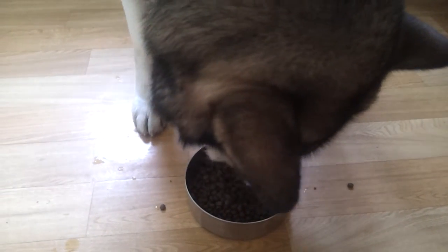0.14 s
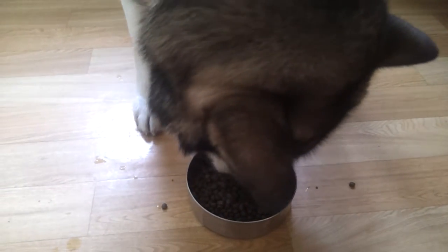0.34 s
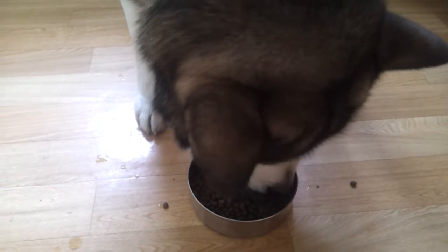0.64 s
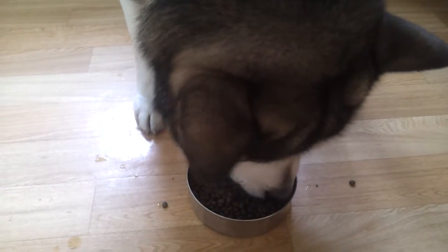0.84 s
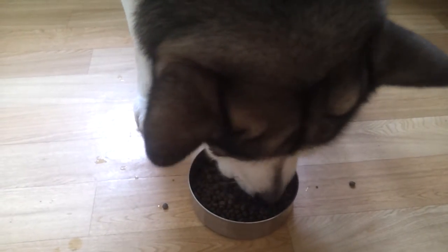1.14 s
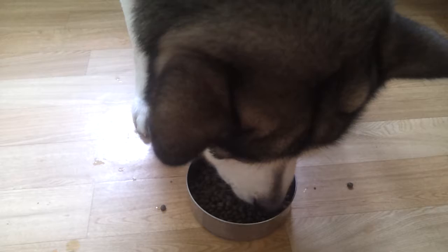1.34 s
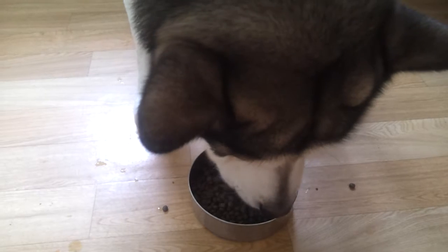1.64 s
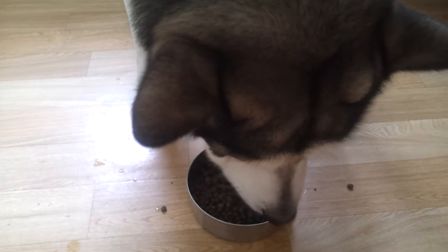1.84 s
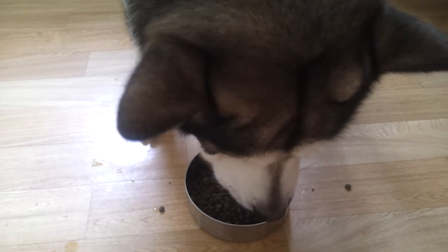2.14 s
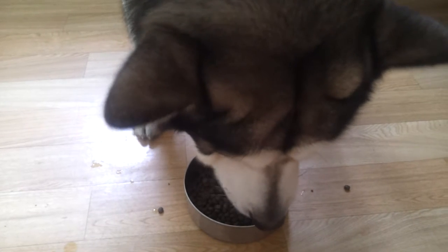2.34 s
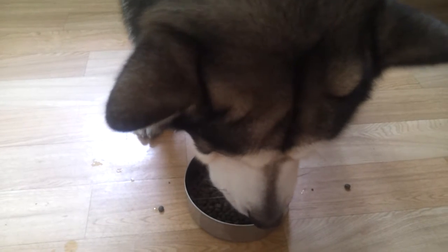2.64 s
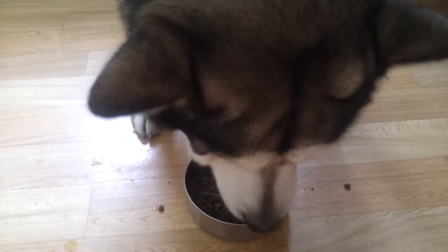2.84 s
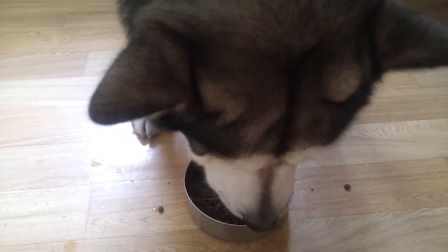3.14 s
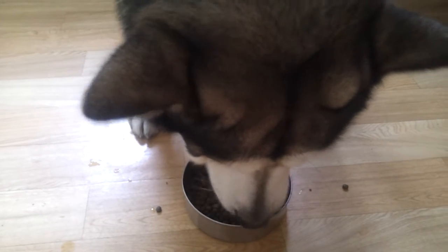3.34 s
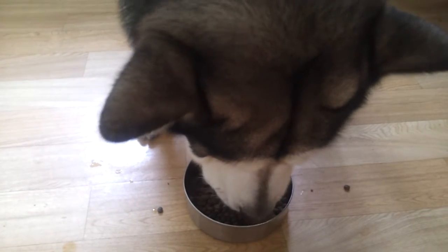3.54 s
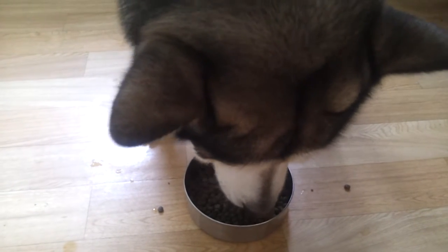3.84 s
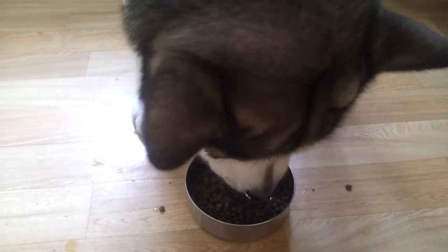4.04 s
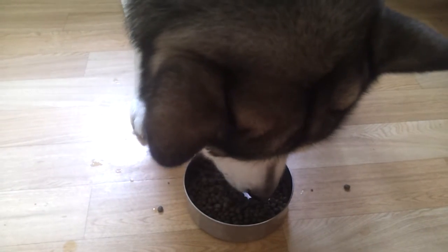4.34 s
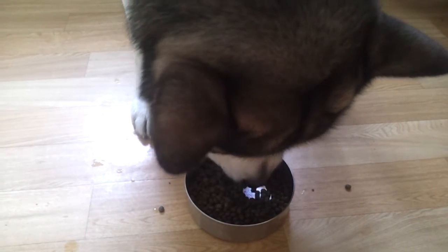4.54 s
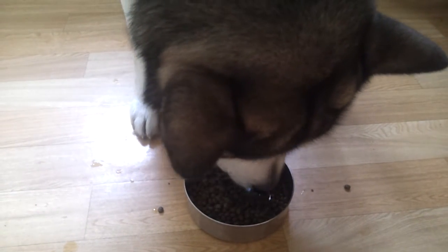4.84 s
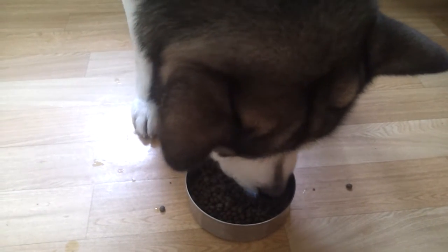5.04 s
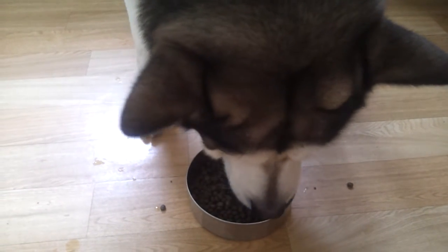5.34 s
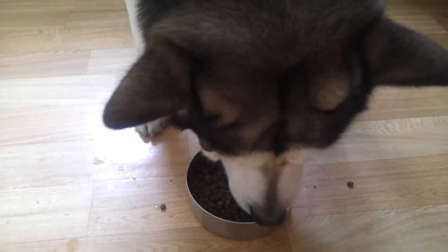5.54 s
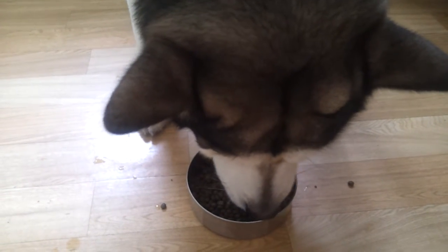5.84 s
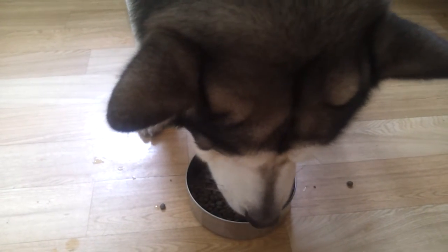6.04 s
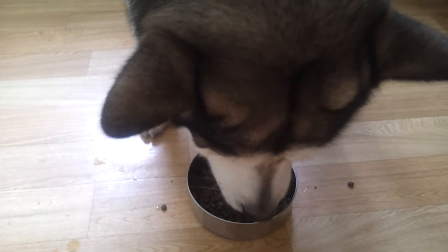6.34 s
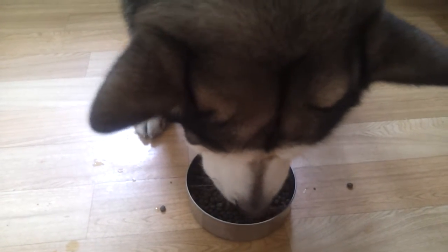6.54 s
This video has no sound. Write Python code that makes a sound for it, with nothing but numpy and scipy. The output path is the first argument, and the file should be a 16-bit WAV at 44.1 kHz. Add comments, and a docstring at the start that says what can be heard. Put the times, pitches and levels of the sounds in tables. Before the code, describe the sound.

Close irregular kibble crunching, metallic pellet clatter and small hollow mouth pops from a feeding dog, with a quiet appliance humming underneath.

```python
"""Dog eating kibble

A large dog eats dry kibble from a steel bowl on a hard floor, close to two spaced microphones.
Pellets crack in short runs of fractures that ring the steel, the pellets, the mouth and the jaw.
The muzzle stirs the heap in clumps of tiny contacts, and the mouth pops as brief decaying sines.
The room answers with decaying noise echoes; steady tones of an appliance and a soft rush lie beneath."""
import sys
import numpy as np
from scipy import signal
from scipy.fft import rfft, irfft, next_fast_len
from scipy.io import wavfile
from scipy.ndimage import map_coordinates

SR = 44100
rng = np.random.default_rng(int(sys.argv[2]) if len(sys.argv) > 2 else 0)


def pcm_store(signal):
    """Save signal as 16-bit PCM."""
    levels = np.round(np.clip(np.atleast_2d(signal), -1, 1) * 32767)
    wavfile.write(sys.argv[1], SR, levels.astype(np.int16).T)


N = 294588

# how alike left and right are in echoes and air: f/Hz, likeness/1 (1 = identical)
LIKENESS = [(60, 0.56), (180, 0.84), (550, 0.55), (1650, -0.045), (4970, 0.11), (15000, -0.12)]
# pellets breaking between the teeth, before the layer offsets: t/s, pellet level/dB, treble re pellet/dB,
# mouth re pellet/dB, jaw thud re pellet/dB
TOOTH_BITES = [(1.3623, -37.5, -3, -29, -18), (1.656, -34.5, -18, -32, -21), (1.931, -40.5, -15, -4, -27),
               (1.955, -50, -17, -4, -25), (1.963, -41, -5, -17, -23), (1.973, -49, -15, -17, -29),
               (2.002, -33, -10, -11, -9), (2.0698, -33.5, -16, 3.5, -14), (2.0759, -21, -15, -10, -17),
               (2.0848, -39, -12, -4, -20), (2.09, -49, -12, 2, -18), (2.324, -37.5, -4, -15, -24),
               (2.364, -38, 4, -16, -24), (2.392, -38.5, -8, -9, -20), (2.4268, -42, -7, 7, -13),
               (2.4419, -35, -10, 4, -4), (2.447, -27, -8, 0, -19), (2.4742, -26, -6, -4, -21),
               (2.4775, -25.5, -10, -10, -18), (2.4875, -32, -8, -2, -15), (2.491, -35, -7, 0, -16),
               (2.4988, -45, 5, 1, -12), (2.514, -39, -12, -4, -21), (2.534, -48, -10, 2, -8),
               (2.543, -39, -10, 2, -12), (2.559, -34, -10, -8, -12), (2.523, -19.5, -7, -7, -14),
               (2.547, -29.5, -3, -28, -7), (2.5628, -30.5, -11, -20, -22), (2.6937, -46, -9, -21, -11),
               (2.905, -34, -11, -16, -19), (2.954, -39, -17, 7, -2), (2.9671, -19, -3, -11.5, -20),
               (2.9694, -16, -8, -14, -26), (2.9707, -17.5, -5, -18, -27), (2.981, -31, -6, -6, -32),
               (2.9855, -34, -10, -4, -29), (3.019, -25.5, -7.5, -7, -9.5), (3.0435, -33, -8, -10, -31),
               (3.049, -29, -8, -19, -27), (3.4344, -36, 3, -3, -12), (3.487, -23, -11, -23, -14.5),
               (3.4955, -25.5, -10, -20, -17), (3.5011, -24.5, -10, -10.5, -14.5),
               (3.5277, -26.5, -4.5, -16, -12), (3.9647, -36, 4, -15, -13), (3.985, -31.5, -8, -19, -14),
               (4.0655, -38.5, -3, -1, 1), (4.0939, -22.5, -11, -12, -9.5), (4.0985, -24.5, -8, -21, -19),
               (4.1115, -46, -15, -17, -14), (4.12, -30.5, -12, -15, -22), (6.469, -36, -12, -9, -17),
               (6.489, -42, -12, -12, -26), (6.536, -29, -1, -17, -18), (6.556, -47, -8, 7, -14),
               (6.617, -47, -8, 0, -18), (6.662, -46, -14, 5, -9), (6.67, -47, -10, 7, -12),
               (4.982, -36, -16, -26, -24), (6.5205, -19, -9, -4, -15.5), (6.5817, -45, -9.5, 5, -7),
               (6.6038, -14.5, -11, -9.5, -18), (6.6353, -16, -5, -3.5, -18), (6.6462, -29, -9, -9, -16)]
REST_DB = (-58, -61, -65)  # steel, pellet and mouth between pushes, before the stirring offset


def amp(db):
    """Amplitude factor of a level in dB."""
    return 10 ** (np.asarray(db) / 20)


def unit(x):
    """x scaled to rms 1."""
    return x / np.sqrt(np.mean(x ** 2) + 1e-20)


def along(points, hz):
    """A curve through (Hz, value) points on a log frequency axis."""
    f, v = np.transpose(points)
    return np.interp(np.log(hz + 1), np.log(f + 1), v)


def wobble(rate):
    """A smooth random curve, rate knots a second."""
    knots = rng.standard_normal(int(N * rate / SR) + 4)
    return map_coordinates(knots, [np.arange(N) * rate / SR])


def filtered(x, response):
    """x times a complex response of frequency."""
    m = next_fast_len(N + SR // 2)
    spectrum = rfft(x, m) * response(np.fft.rfftfreq(m, 1 / SR))
    return irfft(spectrum, m)[..., :N]


def low_pass(edge_hz, damping=1.3):
    """Second-order low-pass response."""
    return lambda hz: 1 / (1 + 1j * damping * hz / edge_hz - (hz / edge_hz) ** 2)


def high_pass(edge_hz):
    """Second-order high-pass response."""
    return lambda hz: -(hz / edge_hz) ** 2 * low_pass(edge_hz)(hz)


def body(x, modes, tilt_db=0, uneven_db=0):
    """x rings resonances (Hz, width Hz, dB), each driven by its own amount; white noise about keeps its level."""
    def resonance(k, centre_hz, width_hz, db):
        sign = (-1) ** k
        return lambda f: sign * amp(db) * 1j * f * width_hz / (centre_hz ** 2 - f * f + 1j * f * width_hz)

    rings = [resonance(k, *mode) for k, mode in enumerate(modes)]
    middle_octave = np.mean(np.log2(np.transpose(modes)[0]))
    grid_hz = np.linspace(0, SR / 2, num=4000)
    power = np.mean(np.abs(sum(ring(grid_hz) for ring in rings)) ** 2)
    total = 0
    for mode, ring in zip(modes, rings):
        octaves = np.log2(mode[0]) - middle_octave
        drive = amp(tilt_db * octaves + uneven_db * wobble(40))
        total = total + filtered(x * drive, ring)
    return total / np.sqrt(power)


def grit(length, rate, spread_db):
    """Sparse tiny fractures of uneven size and random sign, about rate a second, rms 1."""
    chance, size = rng.random(length), rng.standard_normal((2, length))
    return unit((chance < rate / SR) * amp(spread_db * size[0]) * np.sign(size[1]))


def swell(start, hold, attack, t60):
    """Power that rises, holds and dies away."""
    t = np.arange(N) / SR - start
    rise = np.clip(t / attack, 0, 1) ** 2
    return rise * amp(-120 * np.maximum(t - hold, 0) / t60)  # -120 because this is power


def air():
    """Steady rush of the room: noise largely shared in the bass, unrelated between microphones in the treble."""
    # spectrum shape of the rush: f/Hz, relative density/dB per Hz
    rush = [(13, -34), (22, -14), (64, -8.5), (114, -8), (138, -3.5), (168, -13), (227, -9.5), (502, -13.5),
            (625, -14), (997, -20), (2270, -21.5), (7810, -17), (10300, -22), (13900, -23), (15500, -29.5)]

    def mid_side(hz):
        turn = np.arccos(np.clip(along(LIKENESS, hz), -1, 1)) / 2  # balances shared and opposed noise
        return amp(along(rush, hz)) * [np.cos(turn), np.sin(turn)]

    mid, side = filtered(rng.standard_normal((2, N)), mid_side)
    stereo = unit(np.array([mid + side, mid - side]))
    return amp(-49 + 0.18 * wobble(2.76)) * stereo * amp([[-.4], [.4]])


def hum():
    """Steady motor tones that beat and drift slightly, over noise ringing the appliance's casing."""
    # motor tones: f/Hz, mean rms level/dB
    motor = [(59.5, -66.5), (115.5, -51.5), (120, -70), (231, -61), (300, -64)]
    # resonances of the casing: f/Hz, width/Hz, relative level/dB
    casing = [(54.7, 9.5, -1), (111.2, 4.5, 3), (220.1, 9.1, 3), (373, 39, -10)]
    t = np.arange(N) / SR
    tones = 0
    for hz, db in motor:
        level = np.sqrt(2) * amp(db + 0.31 * wobble(2.3))
        tones = tones + level * np.sin(2 * np.pi * hz * t + 0.85 * wobble(1.375))
    shake = rng.standard_normal((3, N))
    rumble = body(shake[0] + 0.5 * shake[1:], casing)  # one shared shake, and one of each microphone's own
    return tones + amp(-53.5) * unit(rumble)


def room(x):
    """Floor and walls answer with noise echoes, redrawn every quarter second; each frequency has its own decay."""
    # reverberation: f/Hz, t60/s
    decay = [(300, 0.24), (2000, 0.17), (8000, 0.11), (14000, 0.2)]
    out, step = np.zeros((2, N + SR)), SR // 4
    for start in range(0, N, step):
        hz, t, z = signal.stft(rng.standard_normal((3, SR // 3)), SR, nperseg=256)
        shared = np.sqrt(np.clip(along(LIKENESS, hz), 0, 1))[:, None]  # long waves echo more alike
        z = shared * z[0] + np.sqrt(1 - shared ** 2) * z[1:]
        z = z * amp(-60 * t / along(decay, hz)[:, None])
        z = z * np.minimum(0.93 + t / 0.021, 1)  # echoes gather at first
        tail = signal.istft(z, SR, nperseg=256)[1]
        echo = signal.fftconvolve(x[:, start:start + step], tail / np.linalg.norm(tail[0]), axes=1)
        out[:, start + 120:][:, :echo.shape[1]] += echo  # echoes start 120 samples late
    return out[:, :N]


def activity():
    """How busy steel, pellets and mouth are: muzzle pushes and grinding around bites, over a resting level."""
    # the muzzle pushes through the heap, before the stirring offset: start t/s, hold/s,
    # pellets on steel level/dB, pellets on pellets re steel/dB, lips re steel/dB
    pushes = [(0.117, 0.055, -49, -9, -13), (0.274, 0.029, -43.5, -38, -31),
              (0.488, 0.081, -40.5, -11, -26), (0.623, 0.092, -31, -5.5, -21), (0.785, 0.083, -38, -8, -30),
              (0.889, 0.055, -32, -6, -25), (1.054, 0.15, -38.5, -4, -17.5), (1.35, 0.02, -47.5, -0.5, -27),
              (1.432, 0.021, -50, 2.5, -12), (1.525, 0.055, -39.5, -8, -30), (1.758, 0.029, -34, -8, -24),
              (1.904, 0.1, -45, 3, -8), (2.182, 0.052, -48.5, -2, -18), (2.324, 0.075, -45.5, -0.5, -11),
              (2.686, 0.035, -50, 2.5, -15), (2.79, 0.11, -45.5, 3, -21), (3.2, 0.032, -55, 2, -11),
              (3.325, 0.076, -46, -1.5, -30), (3.41, 0.034, -44, 3, -8), (3.81, 0.099, -53, -1.5, -11),
              (3.94, 0.068, -41.5, -5, -8.5), (4.304, 0.028, -44.5, -3, -26), (4.751, 0.026, -38, -7, -20),
              (4.92, 0.067, -52.5, 3.5, -4), (5.034, 0.037, -43, -5, -12), (5.422, 0.057, -41.5, 1, -15.5),
              (5.55, 0.14, -40, -3.5, -19), (5.648, 0.12, -39, -2, -12), (5.958, 0.018, -39.5, -3.5, -12),
              (6.172, 0.022, -46, -6, -28), (6.28, 0.028, -38.5, -2, -12), (6.433, 0.036, -44.5, 5.5, -5.5)]
    push_attack_s, push_rise, push_t60_s = 0.011, 0.37, 0.28  # the rise adds this share of the hold
    fidget_db = 4  # how unevenly the resting muzzle shifts
    squeeze_s = 0.015  # the teeth grate on a pellet before it gives
    grind_db, grind_t60_s = (-31, -14.5), 0.19  # crumbs ground after a bite: pellet, mouth re the bite
    power = amp(REST_DB)[:, None] ** 2 * amp(fidget_db * wobble(12)) ** 2
    for s, hold, db, pellet_db, lips_db in pushes:
        levels = amp(db + np.array([0, pellet_db, lips_db]))
        power = power + levels[:, None] ** 2 * swell(s, hold, push_attack_s + push_rise * hold, push_t60_s)
    for s, db, treble_db, mouth_db, jaw_db in TOOTH_BITES:
        levels = amp(db + np.array([-np.inf, grind_db[0], grind_db[1] + mouth_db]))
        power = power + levels[:, None] ** 2 * swell(s - squeeze_s, squeeze_s, squeeze_s, grind_t60_s)
    return np.sqrt(power)


def stirring():
    """The muzzle pushes the heap: many small contacts all over the bowl, in clumps."""
    clumps = amp(1.5 * wobble(50))
    contacts = np.array([[unit(clumps * grit(N, rate=1100, spread_db=5.0)) for ear in "LR"]
                         for part in REST_DB])
    # the mouth's long waves reach both microphones alike
    contacts[2, 1] = 0.66 * contacts[2, 0] + 0.39 * contacts[2, 1]
    offset = amp([[[-5]], [[-5]], [[0]]])  # level offset of the steel, pellet and mouth stirring
    return offset * contacts * activity()[:, None]


def pops():
    """The closed mouth rings briefly like a small hollow box: two decaying sines a pop."""
    # hollow pops and wet ticks of the mouth closing on pellets: t/s, level of the lower sine/dB, f/Hz, t60/s
    closures = [(0.178, -45, 756, 0.053), (0.361, -38.5, 773, 0.066), (0.678, -30.5, 795, 0.077),
                (1.944, -31, 880, 0.029), (1.969, -44, 876, 0.062), (2.324, -33, 825, 0.026),
                (2.367, -44.5, 813, 0.077), (3.173, -29.5, 680, 0.023), (3.438, -40, 842, 0.1),
                (3.798, -46, 975, 0.049), (3.865, -46, 895, 0.05), (3.93, -35, 810, 0.03),
                (4.51, -43, 607, 0.055), (4.584, -36, 560, 0.029), (4.997, -39, 893, 0.037),
                (5.09, -43, 682, 0.057), (5.351, -26, 835, 0.017), (5.393, -25.5, 740, 0.018),
                (4.552, -35.5, 2400, 0.017), (5.665, -38, 780, 0.12), (6.062, -39, 3830, 0.013),
                (6.075, -32, 4420, 0.018), (6.433, -30, 795, 0.027)]
    out, t = np.zeros(N + SR), np.arange(SR // 8) / SR
    for s, db, hz, t60 in closures:
        ring = np.sin(2 * np.pi * hz * t) + 0.3 * np.sin(2 * np.pi * 1.2 * hz * t)
        envelope = amp(db - 60 * t / max(t60, .01)) * (1 - np.exp(-t / 0.002))
        out[round(s * SR):][:len(t)] += envelope * ring
    return out[:N]


def cracks():
    """Each pellet breaks in a short run of fractures; returns the blows to steel, pellet, mouth and jaw."""
    # pellets snapping against the bowl, before the layer offsets:
    # t/s, steel level/dB, pellet re steel/dB, left-right/dB
    clinks = [(0.122, -35, -36, -5), (0.4938, -32, -8, 2), (0.6306, -30, -13, -3), (0.6567, -19.5, -22, -6),
              (0.6958, -23.5, -13.5, -1), (0.675, -28, -18, -1), (0.7, -31, -10, -3), (0.713, -31, -12, 0),
              (0.737, -40, 2, -5), (0.7587, -27, -2, -5), (0.841, -32, -20, -2), (0.88, -40, -13, 0),
              (0.907, -29, -2, 3), (0.797, -25.5, -6, 3), (0.8164, -28.5, -12, -14),
              (0.8363, -21, -12.5, -1), (0.8516, -33, -3, 3), (0.8664, -27, -10, 2), (0.9006, -23, -8, 4),
              (0.915, -26.5, -2, 2), (1.0583, -34, -8, 1), (1.0832, -26.5, -12.5, 2),
              (1.126, -22, -13, 8.5), (1.1592, -24, -22, 10), (1.5386, -32, -29, -3),
              (1.5798, -35, -20, -7), (1.7554, -17, -10.5, -2), (1.7645, -24.5, -6, -3),
              (1.817, -39, -5, 7), (1.8741, -28, -13, 1.0), (2.1028, -32, -23, 1), (2.809, -33, -16, 3),
              (2.834, -32, -14, 3), (3.1202, -35.5, -23, 0), (3.2158, -44.5, 2, 7),
              (3.2491, -40.5, -0.5, 3), (3.3282, -31, -12, -3), (3.3598, -32, -28, -2), (3.81, -34, -10, 6),
              (3.826, -27.5, -36, 3), (3.942, -32.5, -20, -8), (4.2283, -39, -29, -11),
              (4.405, -27.5, -11, 5), (4.4641, -38, -5, 0), (4.493, -26.5, -12, 4), (4.771, -26, -34, 2),
              (4.8058, -36, -22, 4), (5.05, -26.5, -35, -3), (5.161, -33, -9, 2), (5.475, -33.5, -4, -4),
              (5.501, -30, -20, -14), (5.5703, -24, -28, 0), (5.6155, -29, -25, -2), (5.699, -18.5, -9, 3),
              (5.7249, -33.5, 8, -1), (5.789, -41, -4, 5), (5.9682, -23.5, -31, -1.5),
              (6.1826, -32, -5.5, -1), (6.2896, -19.5, -10.5, 4), (6.302, -17, -13, 2),
              (6.3536, -32, -3, 2), (6.4534, -29, -1, 4.5)]
    # pellets that give way all at once, before the layer offsets:
    # t/s, steel level/dB, pellet re steel/dB, left-right/dB
    snaps = [(0.5867, -32, -29, -13), (0.932, -16, -12.5, -0.5), (1.1139, -33, -3.5, 1),
             (1.1437, -16, -16.5, -2.5), (1.1799, -20.5, -14, 2.5), (5.6612, -29, -1.5, 9.5),
             (5.6761, -19, -14, -5), (5.743, -19.5, -7, 0), (0.707, -28, -7, -3), (0.7216, -22.5, -10, 9),
             (0.7538, -8.5, -12.5, 2.5), (1.7595, -11, -19, 5), (1.9537, -48, 16, 1), (2.0991, -27, -22, 0),
             (4.0436, -17.5, -6.5, 3)]
    bowl_offset_db = (-1, 1.5)  # level offsets of the steel and pellet layers of a clink or snap
    bowl_mouth_db = -37  # the little of it that reaches the mouth
    bite_offset_db = (0, 2.5, 9, 11)  # level offsets of the steel, pellet, mouth and jaw layers of a bite
    crumble_scatter = 0.15  # spread of the time the fragments keep breaking
    # typical t60 (s), attack time constant (s), main fracture re the grit of its run (dB)
    clink_run, snap_run, bite_run = (0.02, 0.001005, 10), (0.018, .0001, 17), (0.019, 0.0017, 13)

    events = []
    for hits, run_settings in ((clinks, clink_run), (snaps, snap_run)):
        for s, db, pellet_db, pan_db in hits:
            bowl_db = np.add(bowl_offset_db, [0, pellet_db])
            levels_db = db + np.append(bowl_db, [bowl_mouth_db, -np.inf])
            events.append((s, levels_db, pan_db, *run_settings))
    for s, db, treble_db, mouth_db, jaw_db in TOOTH_BITES:
        levels_db = db + np.add(bite_offset_db, [treble_db, 0, mouth_db, jaw_db])
        events.append((s, levels_db, 0, *bite_run))

    blows, t = np.zeros((4, 2, N + SR)), np.arange(SR // 16) / SR
    for s, levels_db, pan_db, typical_t60, attack, main_db in events:
        t60 = np.clip(typical_t60 * np.exp(crumble_scatter * rng.standard_normal()), .004, .1)
        shape = amp(-60 * t / t60) * (1 - np.exp(-t / attack))
        run = grit(len(t), rate=6000, spread_db=5.0) * shape
        run[round(attack * SR)] = amp(main_db)
        run *= np.linalg.norm(shape) / np.linalg.norm(run)
        # each microphone faces other fragments
        own = np.array([grit(len(t), rate=7000, spread_db=1.0) for ear in "LR"]) * shape
        bright = amp([[pan_db / 2], [-pan_db / 2]]) * (run + 0.67 * own)
        dull = run + 0.027 * own
        parts = np.array([bright, bright, dull, dull])
        blows[:, :, round(s * SR):][..., :len(t)] += amp(levels_db)[:, None, None] * parts
    return blows[..., :N]


def meal():
    """Blows ring the bowl, the pellets and the dog's head; the right microphone is a little farther."""
    # resonances of bowl, pellets, mouth, and bone and flesh of the head: f/Hz, width/Hz, relative level/dB
    steel_modes = [(4440, 900, 0), (6090, 770, 4), (6880, 710, 6.5), (8140, 755, 5.5), (8980, 930, -1),
                   (11000, 930, -12), (13000, 1400, -31.5)]
    pellet_modes = [(1440, 1090, -5.5), (2358, 240, 3), (2945, 650, -1.5), (3670, 160, 2), (4114, 450, -1),
                    (5870, 670, -2)]
    mouth_modes = [(482, 56, -0.5), (627.4, 51, 7.5), (780, 140, 4), (1020, 120, 0), (1220, 68, 1.5)]
    jaw_modes = [(172, 153, -2.5), (251, 133, 0), (376, 100, -3.5)]
    # how the opening and closing jaws colour the sound: t/s, mouth tilt/dB per octave, pellet tilt/dB per octave
    jaw_motion = [(0.75, 13, -2.5), (1.76, 0, -1), (1.95, 2, -1), (2.08, -2, -1), (2.45, 4, -3.5),
                  (2.53, -3.5, -3), (2.975, 8, 0.5), (3.03, -3, -5.5), (3.5, -2.5, -4), (3.99, 5, -1),
                  (4.1, -10, -4), (4.5, 0, 1), (5.5, 7, -1), (6.46, 0, 1), (6.6, 6, -2), (6.65, 0.5, 4)]
    # the microphones shade each other: f/Hz, left-right/dB
    shading = [(60, -0.5), (150, -1), (380, 0.5), (950, -2.5), (2380, -3), (5980, 3.5), (15000, -19.5)]
    uneven_db = 1.5  # every contact lands elsewhere and favours other resonances

    steel, pellet, mouth, jaw = cracks()
    stir = stirring()
    s, *tilts = np.transpose(jaw_motion)
    mouth_tilt_db, pellet_tilt_db = [np.interp(np.arange(N) / SR, s, tilt) for tilt in tilts]
    # small things radiate no bass, the soft mouth no treble
    crunch = filtered(body(pellet + stir[1], pellet_modes, pellet_tilt_db, uneven_db), high_pass(1400))
    chewing = filtered(body(mouth + stir[2], mouth_modes, mouth_tilt_db, uneven_db), low_pass(1230))
    clang = filtered(body(steel + stir[0], steel_modes, uneven_db=uneven_db), high_pass(2650))
    muzzle = crunch + chewing + body(jaw, jaw_modes) + pops()
    # lips and fur dull all but the steel
    near = filtered(muzzle, low_pass(6500, damping=1.2)) + clang
    side = np.array([[1], [-1]]) / 2
    delay_s = .00005  # right behind left
    return filtered(near, lambda hz: amp(side * along(shading, hz)) * np.exp(2j * np.pi * hz * side * delay_s))


def scene():
    """The meal and its echoes over hum and air."""
    near = meal()
    return hum() + air() + amp(-4.5) * room(near) + near


def record(dry):
    """A steep band limit at 14600 Hz takes off the top treble."""
    return filtered(dry, lambda hz: 1 / (1 + (hz / 14600) ** 90))


dry = scene()
out = record(dry)
pcm_store(out)
```